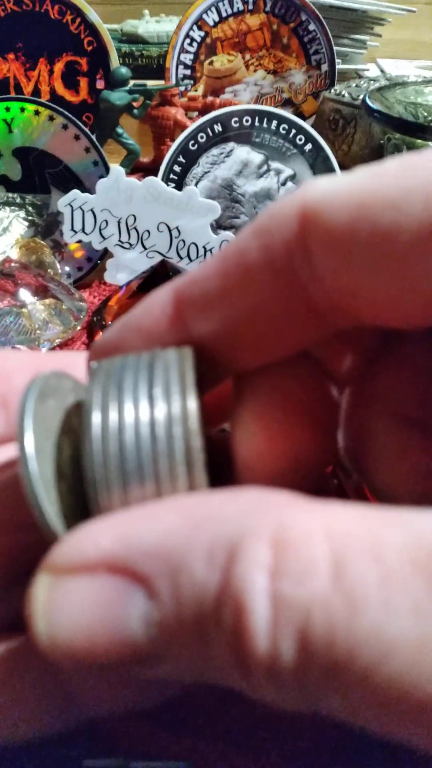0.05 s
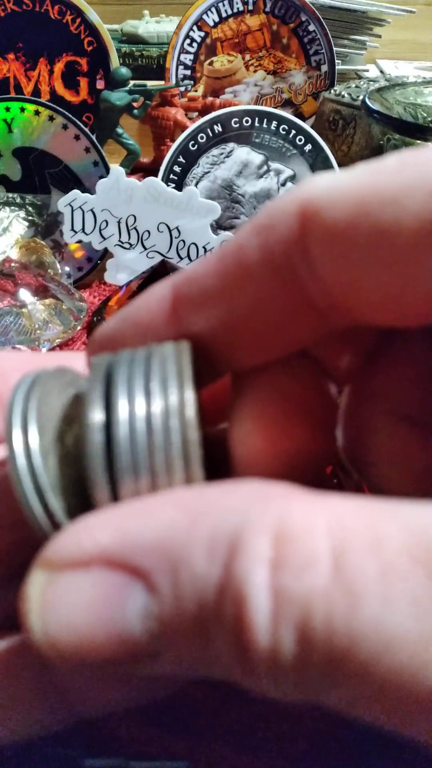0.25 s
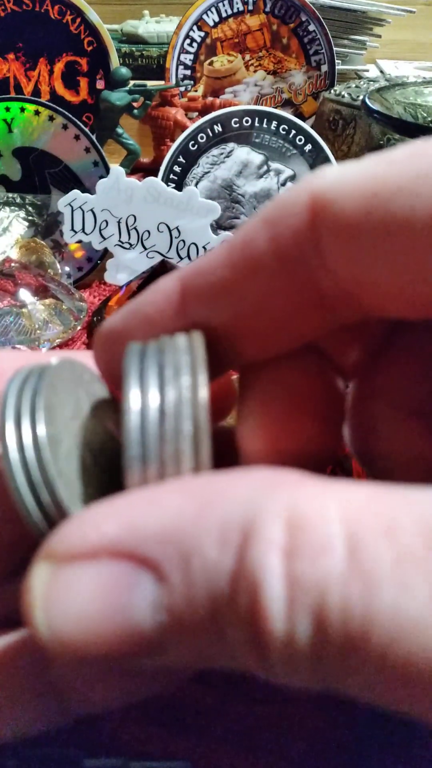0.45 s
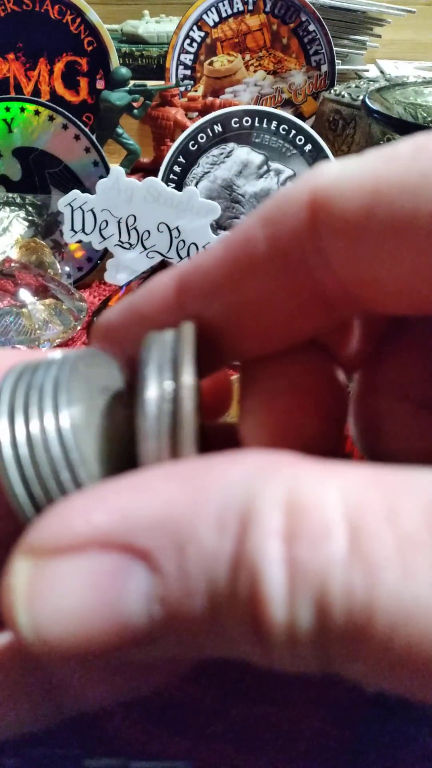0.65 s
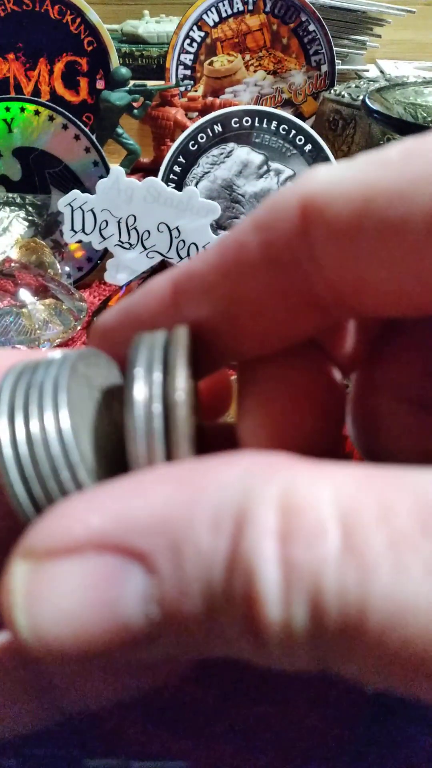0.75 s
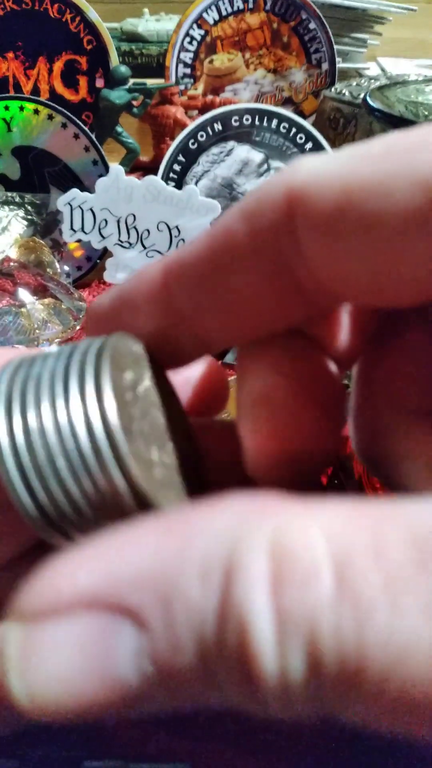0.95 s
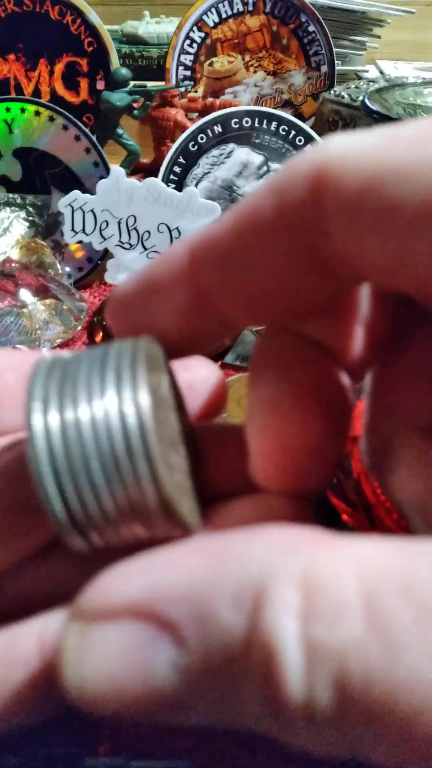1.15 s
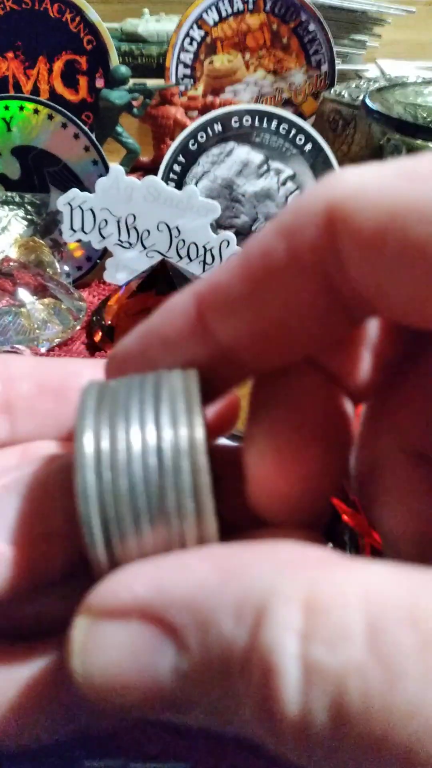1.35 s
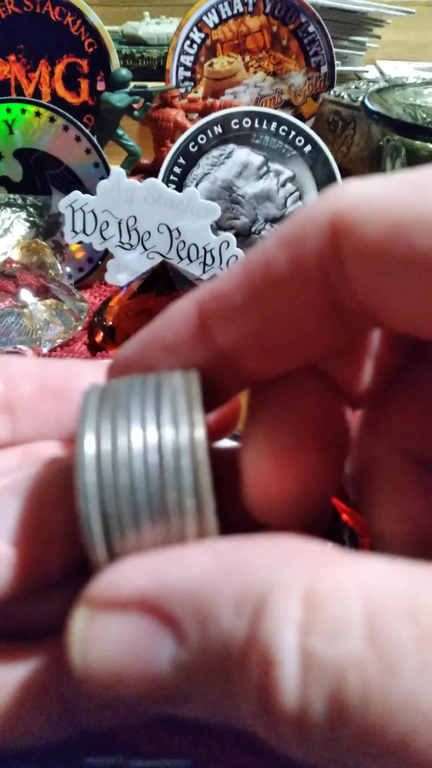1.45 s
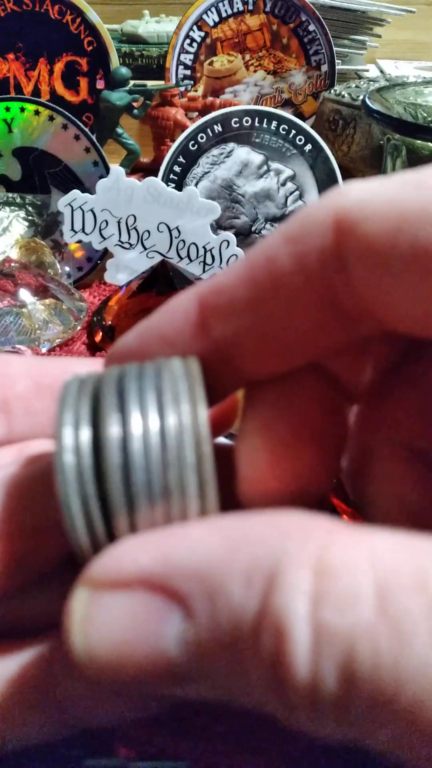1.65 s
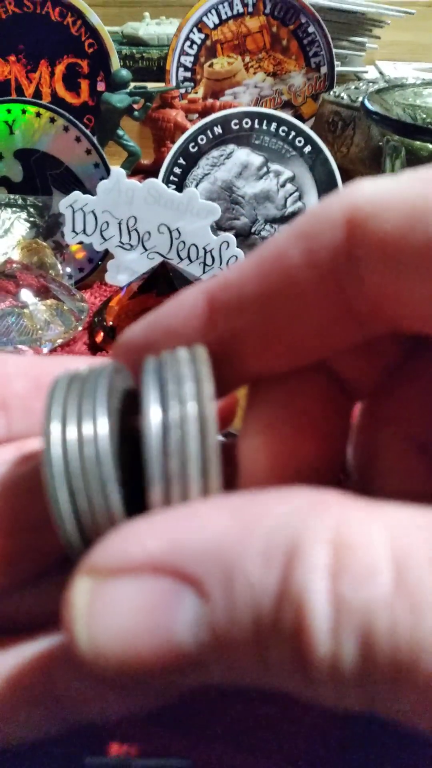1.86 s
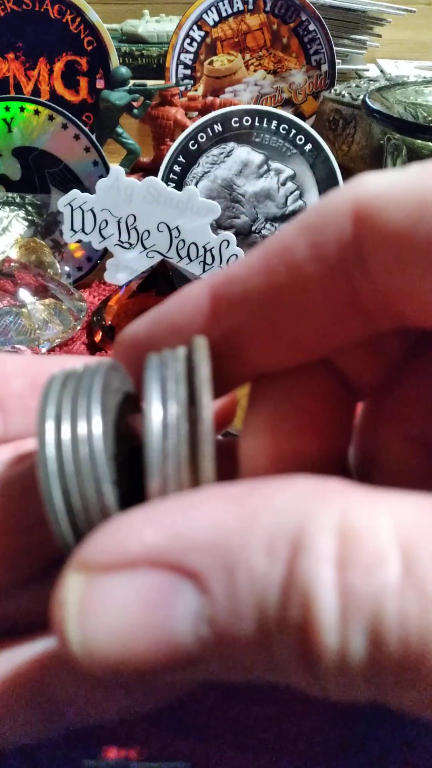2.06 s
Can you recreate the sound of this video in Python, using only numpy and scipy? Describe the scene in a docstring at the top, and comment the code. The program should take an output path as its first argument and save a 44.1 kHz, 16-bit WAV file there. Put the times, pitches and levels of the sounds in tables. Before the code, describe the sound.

Coins clack together close up, bright and gritty, in short bursts in a small quiet room.

```python
"""Coins split in the hand

A short stack of silver coins is split close to a pair of small microphones; coins fall flat against each other.
Each fall is a light first touch, a slap and a few rebounds: noisy cracks, band-limited slap pulses and
short sine modes damped by fingers. Dense decaying noise gives the echoes of a small quiet room;
soft bumps of the hand, a low hum (filtered noise) and a faint hiss lie below."""
import sys
import numpy as np
from scipy import signal
from scipy.fft import rfft, irfft
from scipy.io import wavfile

SR = 44100
rng = np.random.default_rng(int(sys.argv[2]) if len(sys.argv) > 2 else 0)


def wav_record(signal):
    """Record a signal, one row per channel, as 16-bit PCM in the file named by sys.argv[1]."""
    frames = np.transpose(np.atleast_2d(signal))
    bounded = np.clip(frames, -1, 1)
    # unit amplitude maps onto the largest positive 16-bit level
    quanta = np.round(bounded * 32767).astype(np.int16)
    wavfile.write(sys.argv[1], SR, quanta)


N = 92610

CRACK_HIGHPASS_HZ = 4066
PORT_HZ, PORT_WIDTH_HZ, PORT_DB = 9230, 2200, 2   # dB: resonance added to the direct path


def amp(db):
    """Amplitude factor of a level in dB."""
    return 10 ** (np.asarray(db) / 20)


def at_hz(points, hz):
    """Second column of a table, interpolated over log frequency and held at the ends."""
    table = np.array(points)
    return np.interp(np.log(hz), np.log(table[:, 0]), table[:, 1])


def band(x, low_hz, high_hz=0.45 * SR, order=2):
    """Butterworth band-pass."""
    sos = signal.butter(order, [low_hz, high_hz], "band", fs=SR, output="sos")
    return signal.sosfilt(sos, x)


def ring(x, hz, t60_s):
    """Damped resonator: a unit click sets a sine of height 1 ringing."""
    r, w = amp(-60 / (t60_s * SR)), 2 * np.pi * hz / SR
    return signal.lfilter([0, np.sin(w)], [1, -2 * r * np.cos(w), r * r], x + 1e-18)


def trail(x, t60_s):
    """Exponentially decaying envelope started by each click."""
    return signal.lfilter([1], [1, -amp(-60 / (t60_s * SR))], x + 1e-18)


def clicks(t_s, sizes):
    """Stereo click train; the left side hears each click a little later."""
    # lag of the left side over time: t/s, lag/ms
    left_lag = [(.42, .4), (.7, .3), (1.0, .7), (1.78, 0.25)]
    lag_ms = np.interp(t_s, *np.transpose(left_lag))
    out = np.zeros((2, N + SR))
    np.add.at(out[0], ((t_s + lag_ms / 1000) * SR).astype(int), sizes[0])
    np.add.at(out[1], (t_s * SR).astype(int), sizes[1])
    return out[:, :N]


def coins():
    """Contacts and trailing rattle make noisy cracks and strike damped modes; returns crack, ring, knock."""
    # contacts between coins: t/s, ring/dB, crack/dB, left minus right/dB, outer modes/dB
    contacts = [(0.2901,-27.5,-36.5,-6,-2.5),(0.2930,-6.5,-20,8,7),(0.2950,-5.5,-39.5,-1.5,8),
                (.3000,-14.5,-26.5,-8.5,-1),(0.3093,-27.5,-38,-1,1.5),(0.4068,-31.5,-49,1.5,4.5),(0.4116,-3,-21,2.5,-6),(0.4129,-5.5,-15.5,-3,6.5),
                (0.4240,-15,-20,1,-6),(0.428,-20.5,-37.5,-6,-2),(0.449,-43.5,-47.5,8.5,3),(0.578,-57,-66,0,-2.5),
                (0.6960,-41,-30.5,-0.5,-2.5),(0.6995,-10.5,-15,-1.5,-2),(0.7020,-6.5,-20,4.5,-8.5),(0.7053,-2.5,-21,-2,-4.5),
                (0.7144,-18,-24.5,-5.5,-0.5),(0.7208,-17,-41.5,-0.5,-6),(0.7398,-3,-17.5,7,-1.5),(.7438,-14,-32.5,-9,5.5),(0.989,-33.5,-55.5,-1.5,-3.5),
                (0.9929,-21,-34,1.5,-3.5),(0.9970,-6,-14.5,-5.5,5.5),(1.0008,-9,-21.5,0.5,2),(1.0034,-2.5,-16.5,4,-3),(1.0084,-11.5,-32.5,3.5,4.5),(1.0105,-13,-35,-13,4.5),
                (1.0138,-13,-29.5,-2.5,9),(1.023,-1,-10,4,-1),(1.0261,-6,-36.5,-3,6.5),(1.0352,-11,-36,2,0),
                (1.0399,-21.5,-28.5,-14,3),(1.7856,-7.5,-26,3,1),(1.7934,-39,-42,-3,-3.5),(1.9282,-9.5,-30,-2,-5.5)]
    # coin modes, damped by fingers and neighbours: f/Hz, level/dB, t60/s
    coin_modes = [(6320,-20,0.012),(6716,-16.5,0.0054),(7921,-18,0.003),(8100,-9.5,0.0078),(8629,-9.5,0.0088),(8924,-3.5,0.012),
                  (9116,-12,.012),(9520,-17,0.0054),(9843,-19,0.0085),(11535,-19,0.0099),(13700,-32,0.011)]
    main_low_hz, main_high_hz = 7500, 10500   # modes outside this span are the outer ones
    mode_spread_db, side_spread_db = 2, 1.5   # chance per contact, and between the sides
    detune = 0.0041   # share by which worn coins differ in pitch
    rattle_per_s, rattle_db, rattle_t60_s = 2100, -15, 0.03   # tiny touches trailing each contact
    rattle_grit_db = 14.5   # extra rattle in the crack: gritty more than ringing
    contact_s = 0.0013
    stack_hz, stack_t60_s, stack_db = 8780, 0.003, 1.5   # broad knock of the whole stack

    t_s, ring_db, crack_db, pan_db, outer_db = np.transpose(contacts)
    sides = amp(np.outer([0.5, -0.5], pan_db))
    luck = rng.standard_normal((len(t_s), len(coin_modes), 2))
    touches = rng.random((2, N)) < rattle_per_s / SR
    rattle = amp(rattle_db) * touches * rng.standard_normal((2, N))
    t = np.arange(0, contact_s, 1 / SR)
    swell = np.sin(np.pi * t / contact_s) ** 2

    train = clicks(t_s, sides * amp(crack_db))
    burst = signal.lfilter(swell, 1, train) * rng.standard_normal((2, N))
    grit = burst + amp(rattle_grit_db) * rattle * trail(train, rattle_t60_s)
    crack = band(grit, CRACK_HIGHPASS_HZ, order=5)

    strikes = clicks(t_s, [amp(ring_db + stack_db)] * 2)[1]
    knock = ring(strikes, stack_hz, stack_t60_s)

    ringing = np.zeros((2, N))
    coin_of_contact = np.arange(len(t_s)) % 3 - 1   # three coins take turns
    for k, (hz, db, t60_s) in enumerate(coin_modes):
        outer = not main_low_hz < hz < main_high_hz
        chance_db = mode_spread_db * luck[:, k, 0] + side_spread_db * np.outer([1, -1], luck[:, k, 1])
        share = amp(db + outer * outer_db + chance_db)
        for coin in (-1, 0, 1):
            own_hz = hz * (1 + detune * coin)
            struck = coin_of_contact == coin
            # set lower by PORT_DB, as the ports lift the treble
            train = clicks(t_s, struck * sides * share * amp(ring_db - PORT_DB))
            train = train + rattle * trail(train, rattle_t60_s)
            # soft contact: a short swell of the mode's own pitch, near unit gain there
            push = 2 * swell / swell.sum() * np.cos(2 * np.pi * own_hz * t)
            ringing += ring(signal.lfilter(push, 1, train), own_hz, t60_s)
    return crack, ringing, knock


def slaps():
    """Faces meeting flat: one dull band-limited pulse each, scaled by the peak of its louder side."""
    # t/s, peak level/dB, lowest f/Hz, highest f/Hz, left minus right/dB
    slap_table = [(.2930,-26,950,2930,-15),(0.4127,-15.5,900,2953,-13),(0.413,-27,150,918,14.5),
                  (0.6994,-19,280,1683,17),(0.7000,-18,2000,4400,5.5),(0.7401,-25,350,1639,14),(0.7421,-17.5,3050,4917,-16.5),
                  (1.0034,-24,700,2600,6),(1.026,-16,800,2720,18),(1.7850,-36.5,900,2594,18.5),(1.7853,-34.5,3000,4420,-4),(1.9286,-34,3000,4155,-9.5)]
    out = np.zeros((2, N))
    for t_s, db, low_hz, high_hz, pan_db in slap_table:
        click = clicks(np.array([t_s]), amp([[pan_db / 2], [-pan_db / 2]]))
        pulse = band(click + 1e-18, low_hz, high_hz, order=4)
        out += amp(db) * pulse / np.abs(pulse).max()
    return out


def port(x):
    """The air in the small microphone ports resonates and lifts a band of treble."""
    r = np.exp(-np.pi * PORT_WIDTH_HZ / SR)
    feed = np.array([1, 0, -1]) * (1 - r * r) / 2
    back = [1, -2 * r * np.cos(2 * np.pi * PORT_HZ / SR), r * r]
    return x + amp(PORT_DB) * signal.lfilter(feed, back, x)


def room(x):
    """Dense echoes: noise that dies band by band, separate on each side, driven by the mono sum."""
    # reverberation: f/Hz, level/dB, t60/s
    decay = np.array([(800,0.5,0.25),(2000,-1.5,0.21),(4300,1.5,0.15),(6000,2,0.23),(6850,1.5,0.19),(8500,-2.5,0.22),(13120,1,0.2)])
    onset_s, tail_end_s = 0.0016, 0.21   # the tail falls away quickly after its end
    desk_db, desk_t60_s = 14.5, 0.035   # early echoes off hand and desk, above the tail
    t = np.arange(SR // 2) / SR
    edges_hz = np.geomspace(200, 18000, 18)
    white = rng.standard_normal((2, 2, len(t)))
    early = amp(desk_db - 60 * t / desk_t60_s)
    tail = np.zeros((2, len(t)))
    for k, (low_hz, high_hz) in enumerate(zip(edges_hz, edges_hz[1:])):
        hz = np.sqrt(low_hz * high_hz)
        late = amp(-60 * t / at_hz(decay[:, ::2], hz))
        # neighbouring bands use different noise
        tail += amp(at_hz(decay[:, :2], hz)) * band(white[k % 2], low_hz, high_hz) * (late + early)
    tail *= (1 - np.exp(-(t / onset_s) ** 2)) * np.exp(-(t / tail_end_s) ** 4)
    tail /= np.sqrt(SR / 100)
    return signal.fftconvolve(x.mean(0)[None], tail, axes=1)[:, :N]


def bumps():
    """Soft bumps of the hand: damped low sines, band-passed, alike on both sides."""
    # t/s, level before the band-pass/dB, f/Hz, t60/s
    bump_table = [(0.055, -50, 121, .1), (0.597, -46, 118.3, 0.072)]
    thuds = np.zeros(N)
    for t_s, db, hz, t60_s in bump_table:
        thuds += ring(amp(db) * (np.arange(N) == int(t_s * SR)), hz, t60_s)
    return band(thuds, 79, 280)


def coloured(spectrum):
    """Stereo noise of a given spectrum, partly alike on both sides; rms 1."""
    # left-right likeness of the background: f/Hz, correlation (0 to 1)
    likeness = [(60, 1), (200, 0.81), (640, 0.085)]
    hz = np.maximum(np.fft.rfftfreq(N, 1 / SR), 1)
    mid, side = rfft(rng.standard_normal((2, N)))
    alike = at_hz(likeness, hz)
    pair = np.sqrt(1 + alike) * mid + np.sqrt(1 - alike) * side * [[1], [-1]]
    noise = irfft(amp(at_hz(spectrum, hz)) * pair, N)
    return noise / np.sqrt(np.mean(noise ** 2) + 1e-20)


def hum():
    """Low room hum: coloured noise, high-passed."""
    # hum spectrum: f/Hz, density/dB per Hz
    hum_spectrum = [(24, -30.5), (40, -3), (221, -9), (333, -12), (401, -16.5), (1200, -35), (1560, -61),
                    (2640, -120)]
    unfiltered_db = -68   # rms before the filter
    return amp(unfiltered_db) * band(coloured(hum_spectrum), 45, order=3)


def hiss():
    """Faint steady hiss: coloured noise."""
    # hiss spectrum: f/Hz, density/dB per Hz
    hiss_spectrum = [(590, -34), (1000, -11), (1500, -16.5), (2050, -12.5), (5360, -22), (8420, -6.5),
                     (11400, -18), (15900, -31.5)]
    rms_db = -81
    return amp(rms_db) * coloured(hiss_spectrum)


def scene():
    """Coins and echoes through the ports, over bumps, hum and hiss; the knock is heard only in the room."""
    room_db, ring_to_room_db = -19.5, -7
    crack, ringing, knock = coins()
    crack = crack + slaps()
    to_room = crack + band(knock, CRACK_HIGHPASS_HZ) + amp(ring_to_room_db) * ringing
    echoes = amp(room_db) * room(to_room)
    return port(crack + ringing + echoes) + bumps() + hum() + hiss()


def record(dry):
    """Peaks beyond 0.97 clip; a steep low-pass then cuts the top."""
    stop_hz, stop_db = 16900, 60
    low_pass = signal.cheby2(12, stop_db, stop_hz, fs=SR, output="sos")
    return signal.sosfilt(low_pass, np.clip(dry, -0.97, 0.97))


dry = scene()
out = record(dry)
wav_record(out)
```